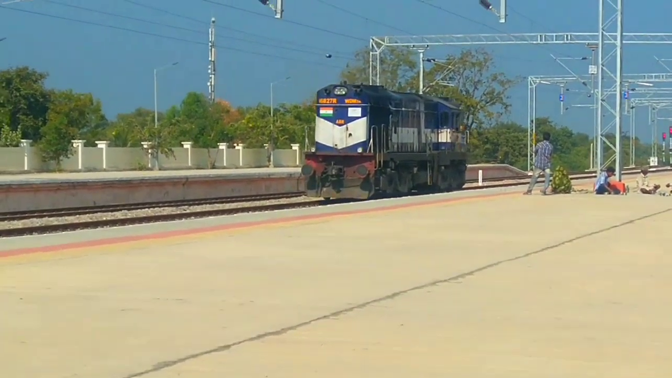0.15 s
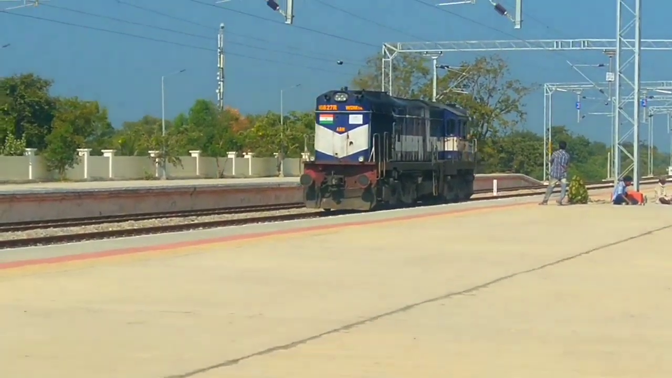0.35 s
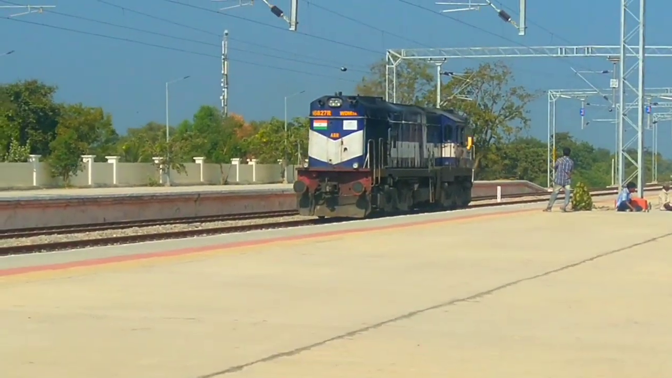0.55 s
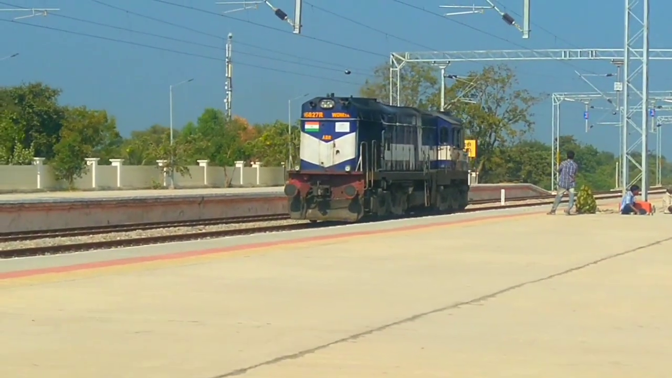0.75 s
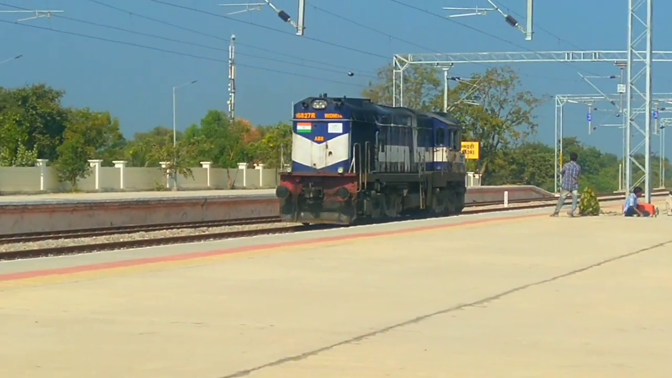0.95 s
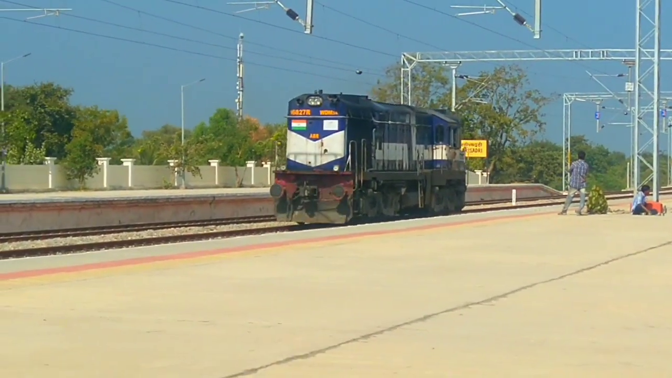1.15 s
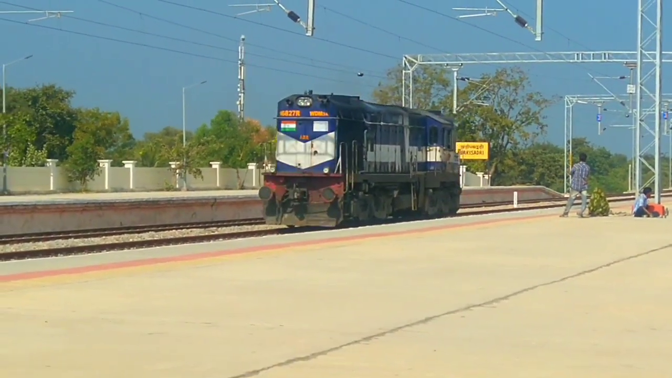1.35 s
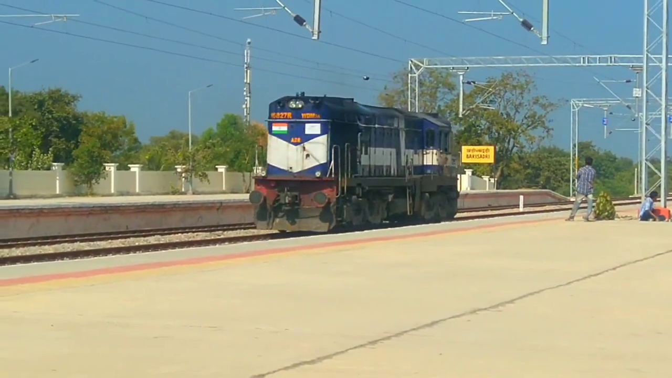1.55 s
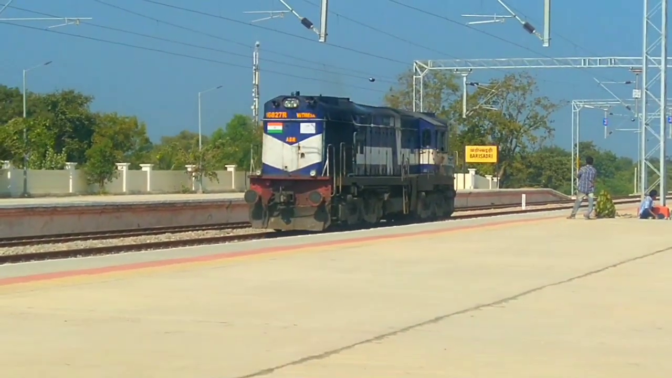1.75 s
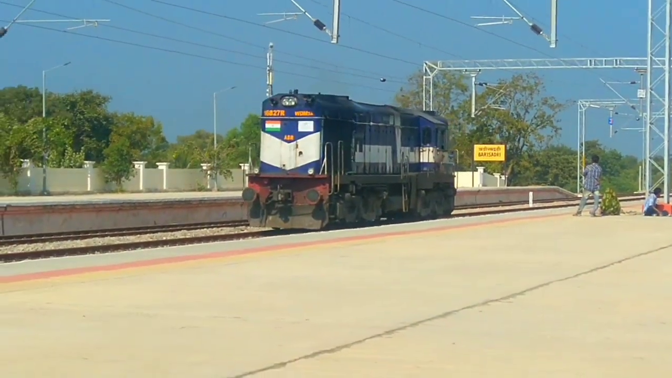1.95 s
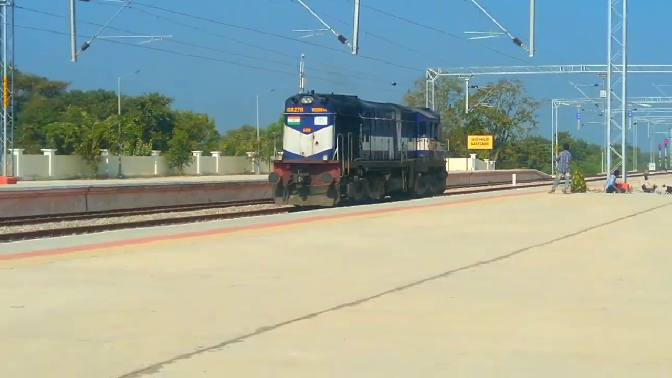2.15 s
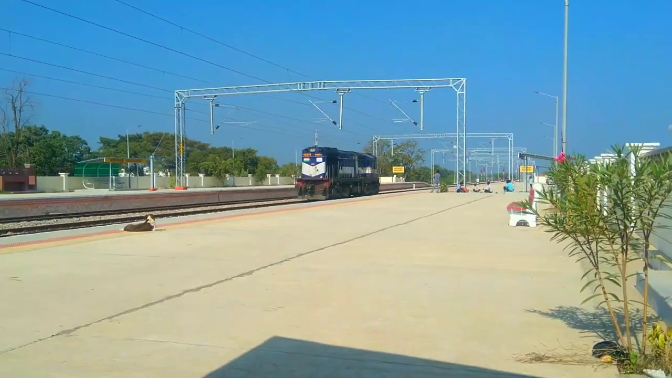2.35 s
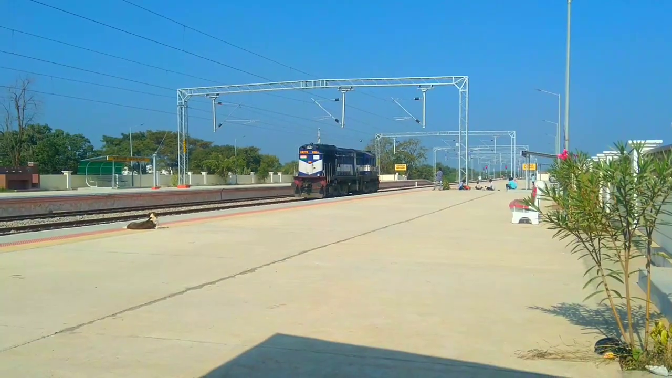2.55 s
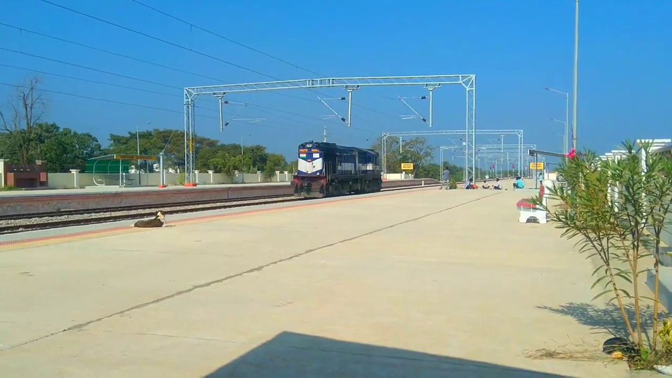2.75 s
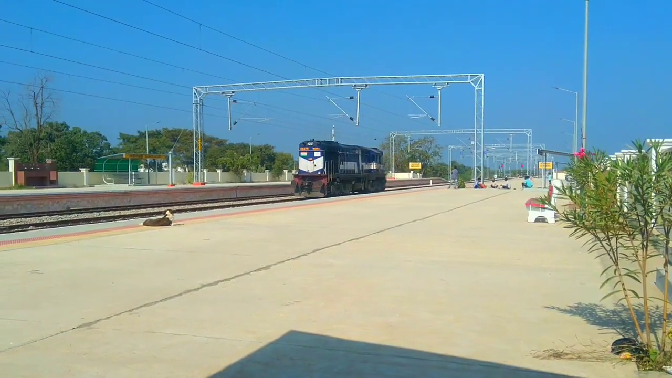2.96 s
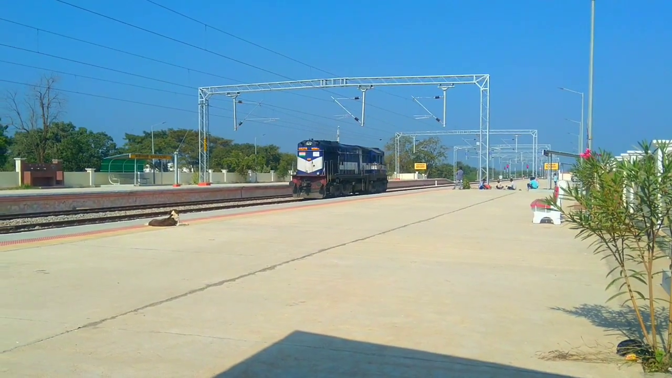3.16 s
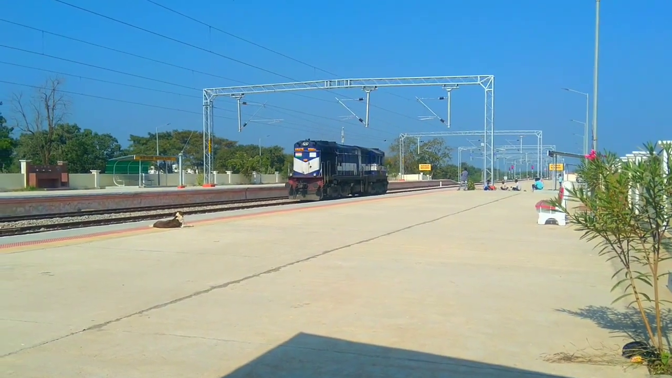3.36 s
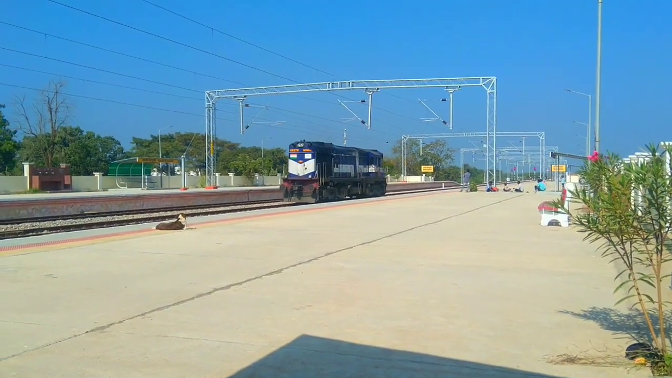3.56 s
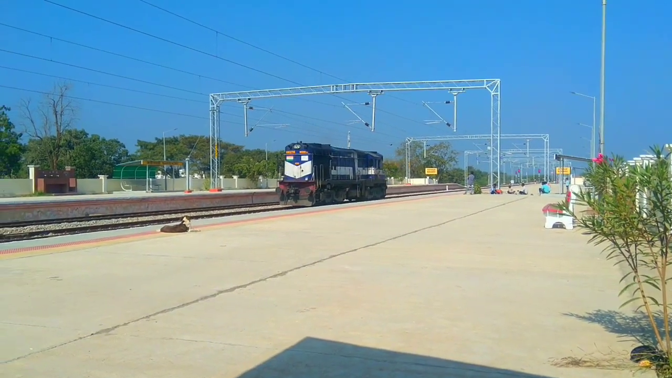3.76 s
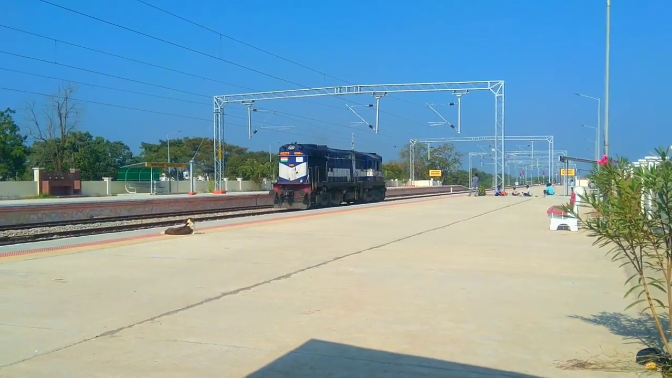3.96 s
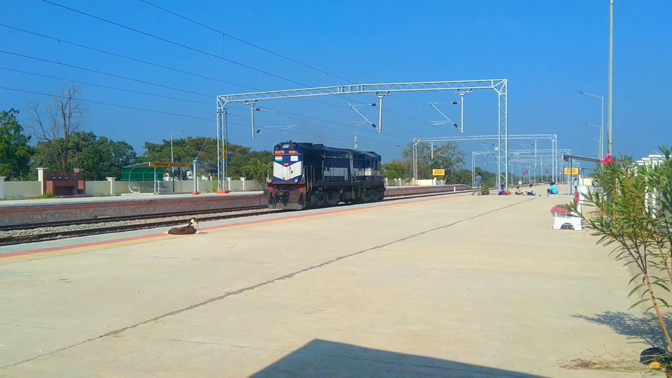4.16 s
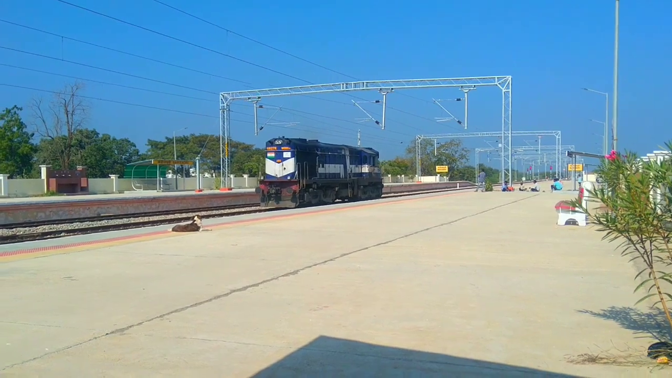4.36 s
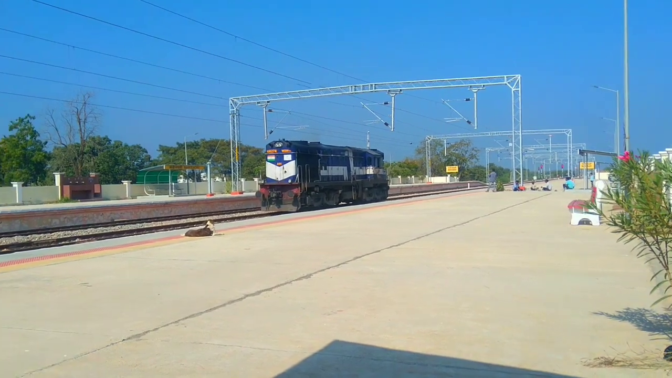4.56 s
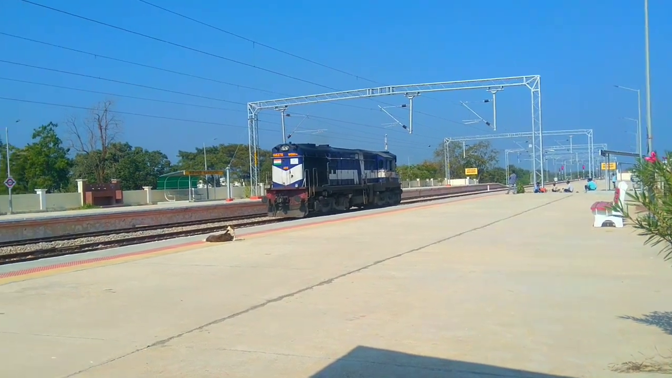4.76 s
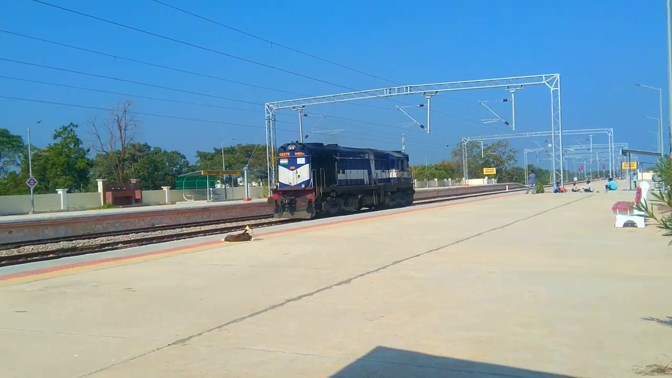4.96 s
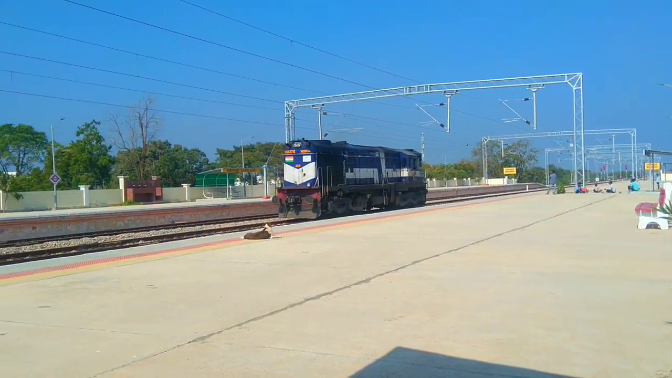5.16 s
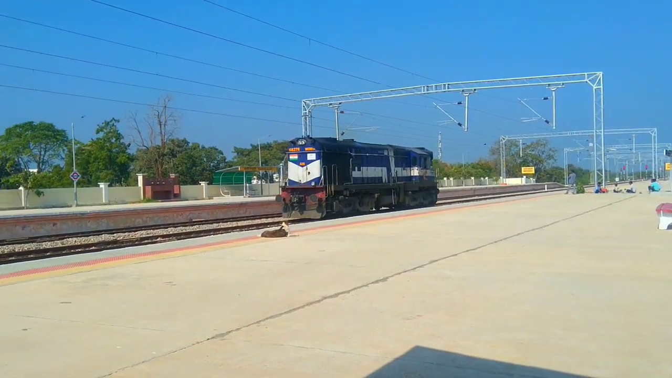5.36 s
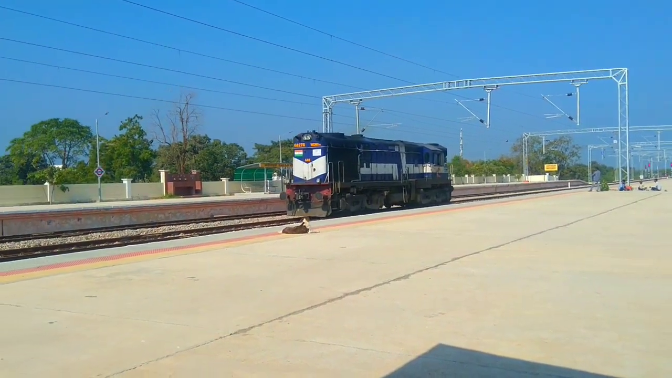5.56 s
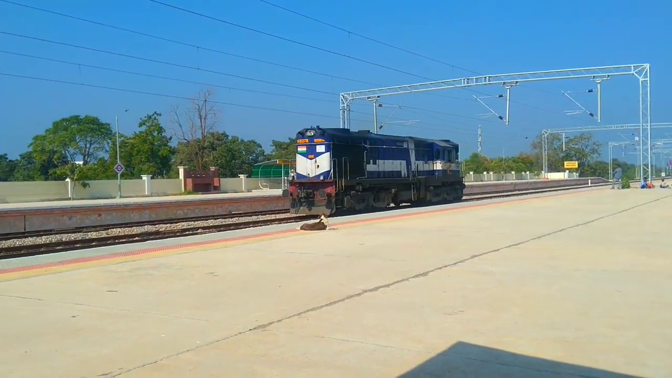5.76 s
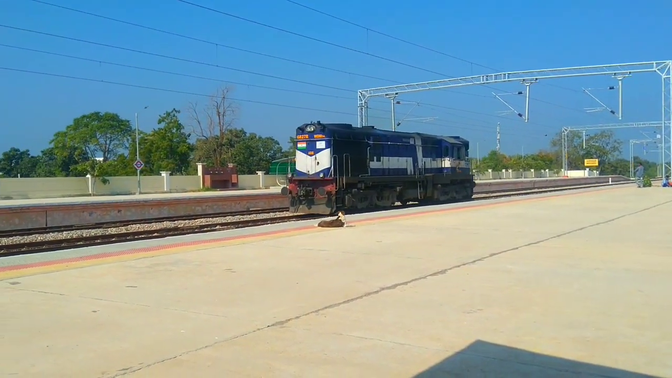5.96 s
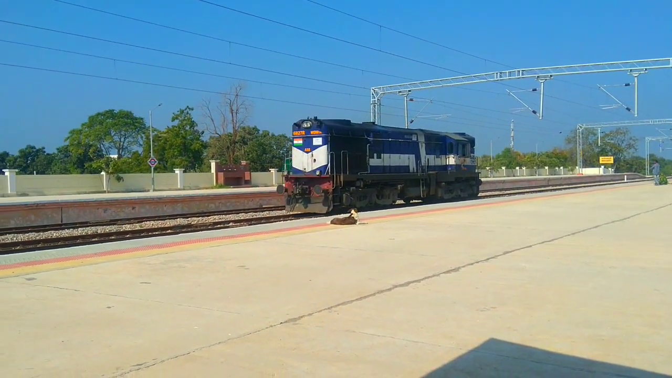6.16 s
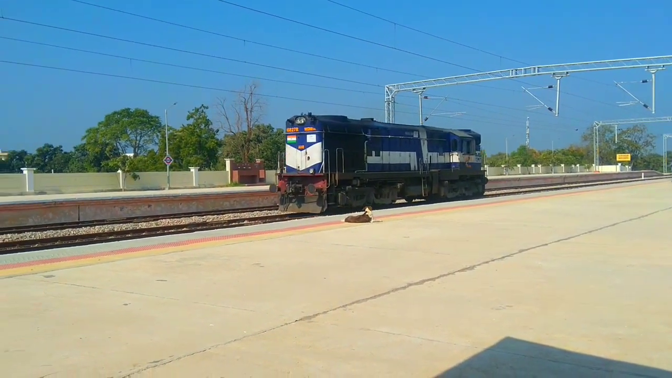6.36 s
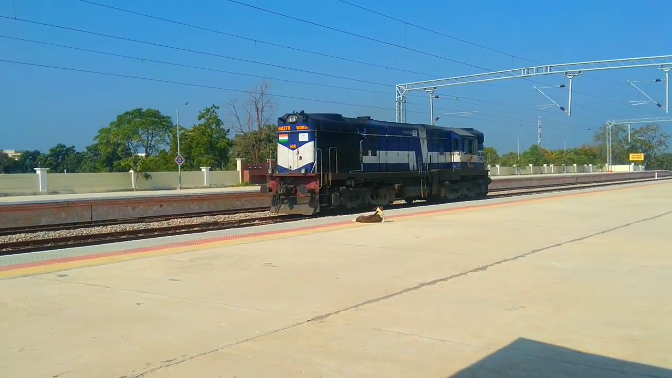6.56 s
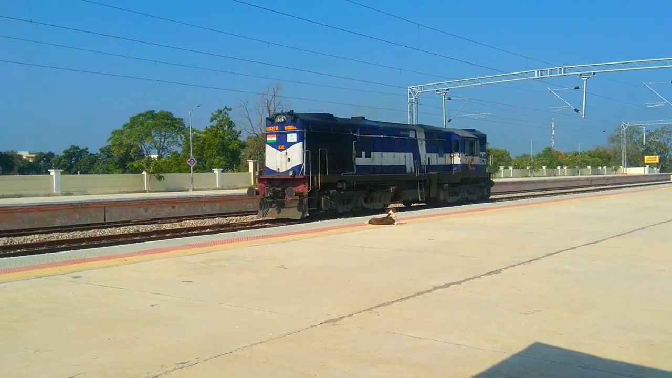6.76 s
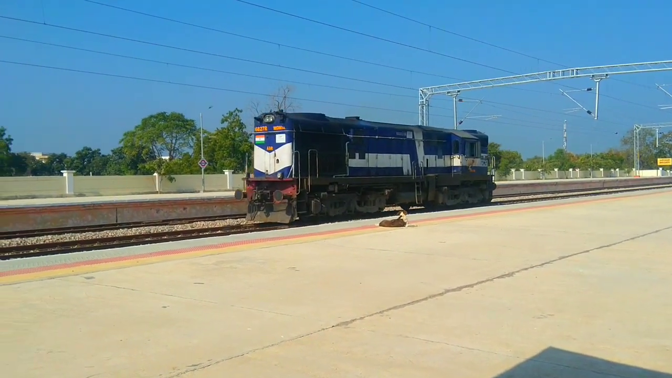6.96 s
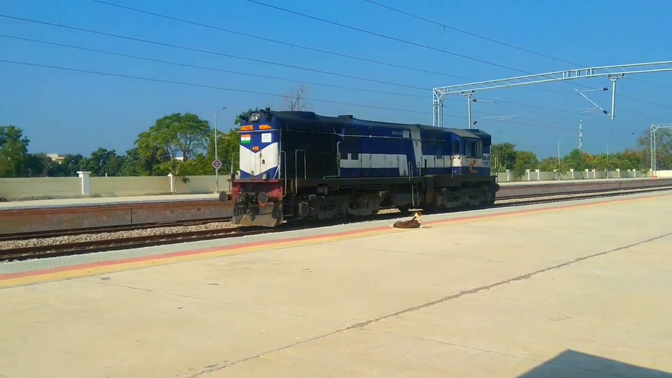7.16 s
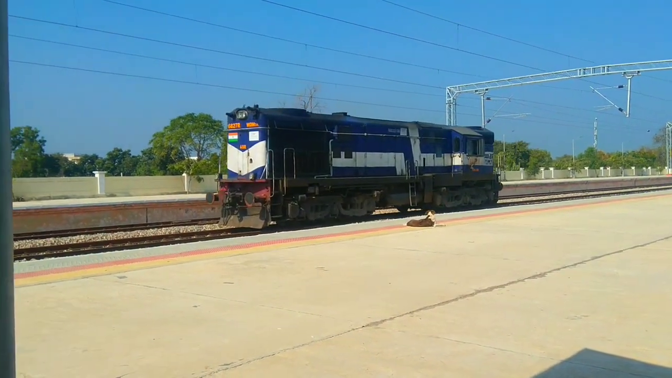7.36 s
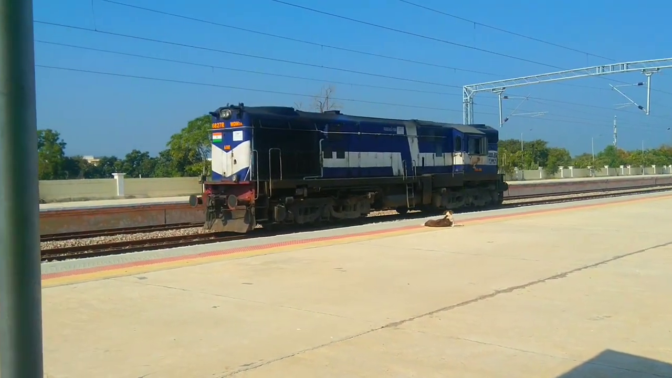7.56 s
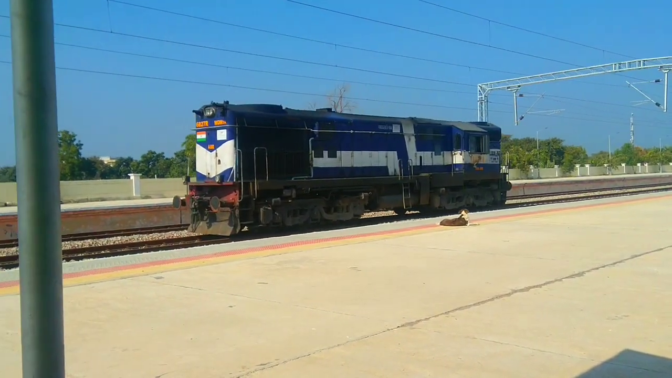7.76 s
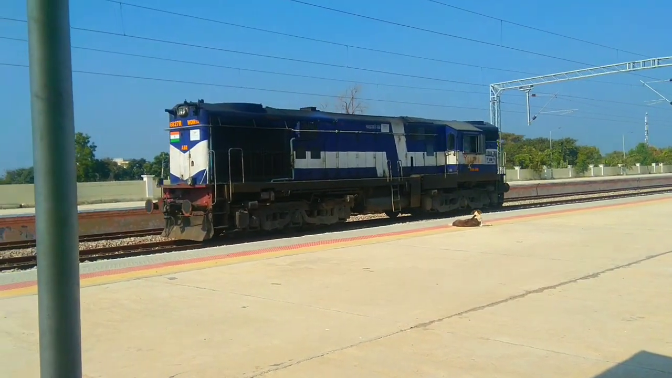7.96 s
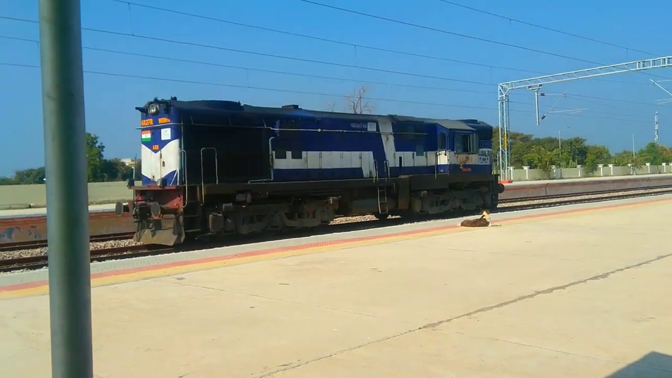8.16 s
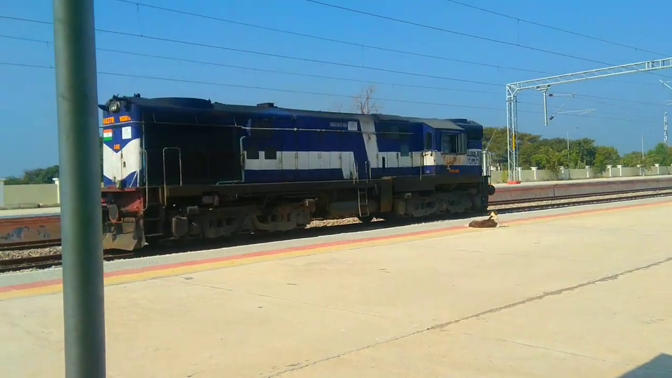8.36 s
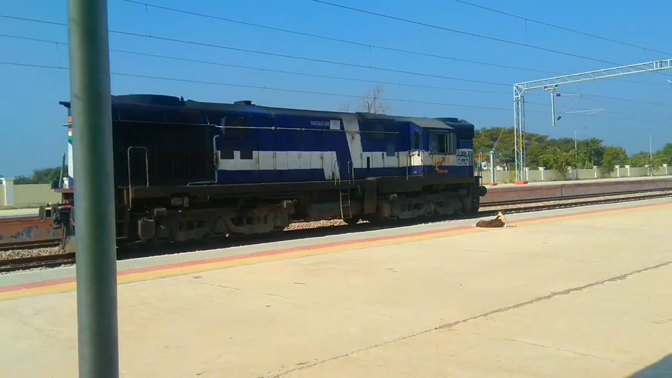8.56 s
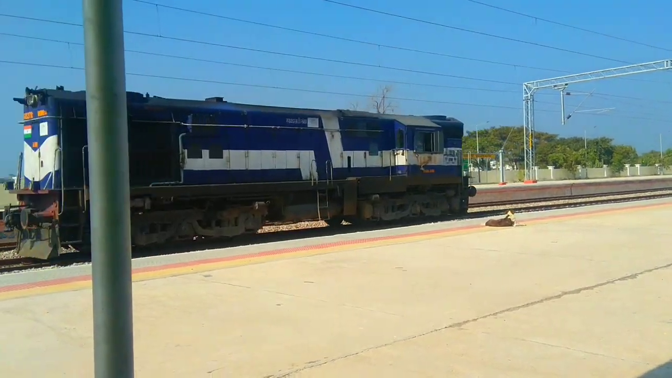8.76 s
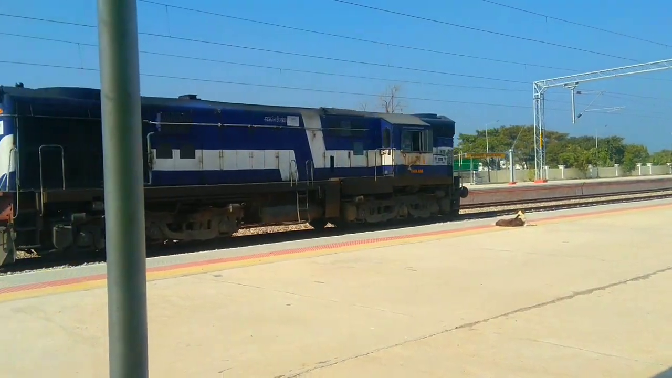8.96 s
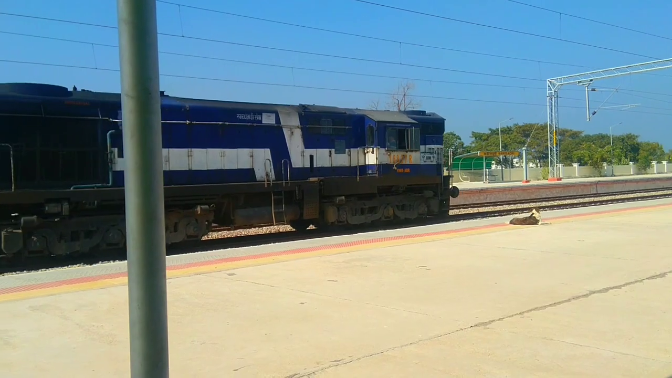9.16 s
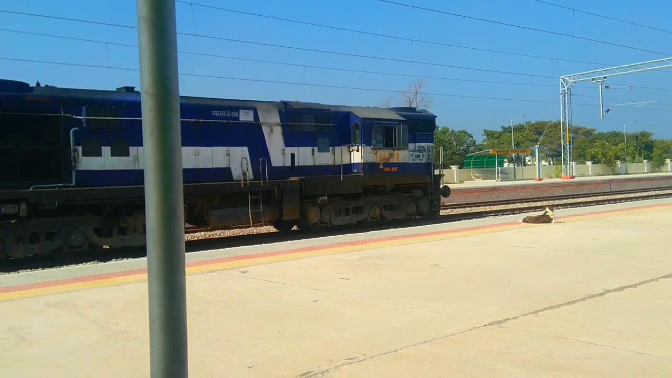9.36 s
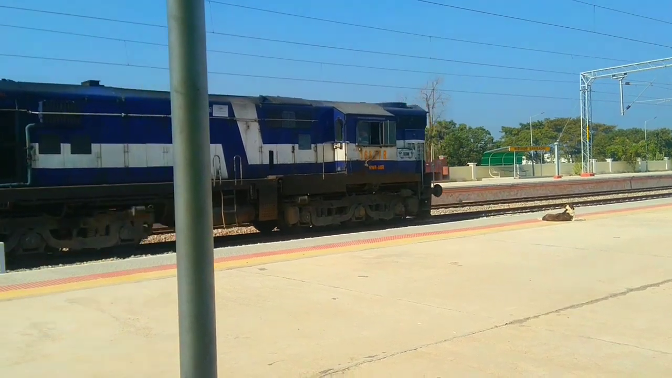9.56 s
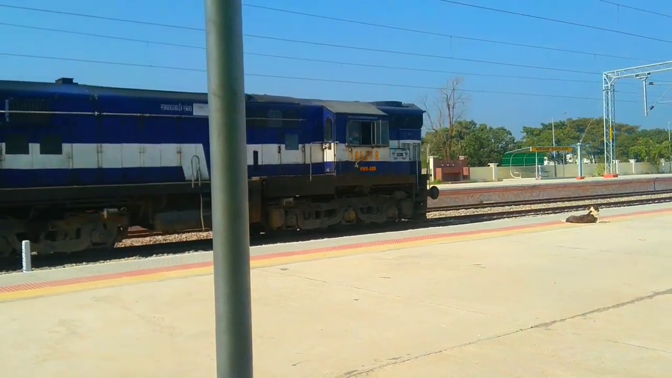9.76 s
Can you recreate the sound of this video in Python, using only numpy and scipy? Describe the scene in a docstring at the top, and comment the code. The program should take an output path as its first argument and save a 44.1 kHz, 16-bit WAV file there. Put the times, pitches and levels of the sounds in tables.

```python
"""Diesel locomotive at a platform

A diesel locomotive rolls slowly along an open station platform and draws level with the listener.
Pulses of sixteen cylinders ring the exhaust stack, where separate chugs sound as decaying notes.
Filtered noise makes the gas, clatter and hiss; gliding resonances make the turbocharger and a whine.
An air valve blows off once; close by, the loudest swings of the exhaust boom are flattened."""
import sys
import numpy as np
from scipy import signal
from scipy.fft import rfft, irfft
from scipy.io import wavfile
from scipy.ndimage import uniform_filter1d, map_coordinates

SR = 44100
rng = np.random.default_rng(int(sys.argv[2]) if len(sys.argv) > 2 else 0)


def master(y):
    """Save y as 16-bit WAV."""
    cut = np.clip(np.atleast_2d(y).T, -1, 1)
    pcm = np.round(cut * 32767)  # scale
    wavfile.write(sys.argv[1], SR, pcm.astype(np.int16))


N = 433062

# Engine speed; one cycle is two turns of the crank. Each row: time in seconds, engine cycles per second.
SPEED = [(0.0, 3.423), (0.8, 3.595), (1.5, 3.813), (2.6, 3.496), (4.0, 3.773), (4.8, 3.595), (5.8, 3.716),
         (7.5, 3.74), (9.82, 3.543)]
# How hard the engine works; it takes up load twice. Each row: time in seconds, effort in dB.
EFFORT = [(0, -10.5), (.45, -15.5), (.56, -1), (.64, 3.5), (1.25, 1), (1.9, -2.5), (2.75, -5), (3.05, 7),
          (3.7, 6.5), (4.3, 3), (6, 2.16), (7.3, 0.8), (8.9, 0.4), (9.82, -1)]
# Air valve. One row: opening in seconds, level in dB, rise in seconds, fall of the jet in dB per second.
VALVE = (2.031, -14.3, .012, 57)


def from_db(db):
    """Amplitude gain is ten to the power of a twentieth of the decibels."""
    return 10 ** (np.asarray(db) / 20)


def rms_one(x):
    """Scaling by the root mean square gives unit power."""
    return x / np.sqrt(np.mean(x ** 2) + 1e-20)


def clock():
    """Sampling: the time of each sample in seconds."""
    return np.arange(N) / SR


def in_time(rows):
    """Linear interpolation of each column of a curve at every sample."""
    s, *columns = np.transpose(rows)
    return [np.interp(clock(), s, c) for c in columns]


def over_bins(points, outside=None):
    """Interpolation over log frequency, read at every spectral bin."""
    hz, value = np.transpose(points)
    log_bins = np.log(np.fft.rfftfreq(N, 1 / SR) + 1e-3)
    return np.interp(log_bins, np.log(hz), value, outside, outside)


def drift(rate):
    """Random modulation: smooth chance of unit power, changing about rate times a second."""
    knots = rng.standard_normal(4000)
    return rms_one(np.interp(clock() * rate, np.arange(len(knots)), knots))


def steady(x, span_s):
    """Envelope flattening: division by the RMS in a sliding window."""
    window = max(int(span_s * SR), 2)
    return x / np.sqrt(np.abs(uniform_filter1d(x ** 2, window)) + 1e-12)


def swell(s, length):
    """A Gaussian envelope: a smooth bump in time."""
    return np.exp(-np.minimum(((clock() - s) / length) ** 2, 20))


def resonate(x, modes):
    """Parallel pipe resonances, each passed twice for steep flanks."""
    f = np.fft.rfftfreq(N, 1 / SR) + 1e-3
    response = 0
    for k, (hz, width, db) in enumerate(modes):
        once = 1 / (1 + 1j * (f * f - hz * hz) / (f * width * np.pi / 2))
        sign = (-1) ** k  # neighbours in opposite phase
        response = response + sign * from_db(db) * once * once
    return irfft(rfft(x) * response, N)


def gliding(x, hz, width_hz):
    """Heterodyning: a steep-sided low-pass around a moving carrier makes a gliding resonance."""
    turn = np.exp(2j * np.pi * np.cumsum(hz) / SR)
    r = np.exp(-np.pi * width_hz / SR)
    low = signal.lfilter([1], [1, -2 * r, r * r], x / turn)
    return rms_one((low * turn).real)


def spread(mid, side):
    """Interaural coherence: two spectra become a stereo pair, alike in the bass, not in the treble."""
    # Likeness of the ears. Each row: frequency in Hz, left-right likeness (held within -1 to 1).
    likeness = [(100, 7), (200, 2), (270, 0.8), (500, 0.84), (1000, 0.5), (2000, 0.22), (4000, 0.26),
                (10000, 0)]
    # Balance of the ears. Each row: frequency in Hz, left minus right in dB.
    balance_db = [(100, -2.5), (500, -2.5), (1100, -3), (2000, -5), (3100, -8.5), (4100, -4.5), (5000, 1.5),
                  (6500, 3), (8300, 6), (10500, 0.5), (13000, 1)]
    alike = np.clip(over_bins(likeness), -1, 1)
    sides = np.array([[1], [-1]])
    pair = np.sqrt(1 + alike) * mid + sides * np.sqrt(1 - alike) * side
    pair = irfft(pair * from_db(sides * over_bins(balance_db) / 2), N)
    return pair / np.std(pair.mean(axis=0))


def noise(colour):
    """Turbulence is broadband: stereo white noise shaped to a given spectrum."""
    white = rfft(rng.standard_normal((2, N)))
    return spread(*white * from_db(over_bins(colour, -np.inf)))


def stack(pulses, puff, turbulence=0.62, bark_turbulence=1.36):
    """Excited resonance: firing pulses and turbulence ring the exhaust, with a little sideways scatter."""
    # Exhaust resonances from low to high. Each row: frequency in Hz, width in Hz, relative level in dB.
    rumble_modes = [(50, 14.3, 6.5), (61.5, 24.4, 8)]
    chest_modes = [(91.4, 5.8, -4), (112.4, 9.8, 0.5)]
    growl_modes = [(136, 9.3, 1), (154.9, 19.5, 1.5)]  # the lower flank of the boom
    boom_skirt = [(177.4, 22.7, -0.022), (200.7, 22, -0.22)]
    bark_modes = [(240.2, 11.3, -4.5), (290.2, 25.2, -1)]
    honk_modes = [(334.4, 20.4, -7.5), (367, 34, 0)]
    # Rumble level. One row: dB when abreast at zero effort, share of the distance law, share of the effort.
    rumble_level = (-25.5, -0.12, 0.36)
    # Chest tone: opens up on the approach, sinks in passing. Each row: seconds, pitch in Hz, level in dB.
    chest_curve = [(0, 112.5, -27.5), (1, 111.7, -25), (2.3, 109.4, -25.5), (3.7, 112.4, -21),
                   (5.0, 110, -25.5), (6, 109.4, -23.5), (7.3, 114, -21), (7.9, 113.3, -19),
                   (8.35, 115.3, -14), (9, 109.6, -12), (9.82, 102, -17.5)]
    # Levels of growl, rough boom between chugs, bark and honk. Each row: time in seconds, level in dB.
    growl_level = [(0, -29), (.6, -24.5), (1.25, -23), (1.6, -24), (2.3, -28.5), (4, -25.5), (5.5, -27),
                   (6.4, -18.5), (7.1, -14.5), (7.8, -13), (8.3, -12), (9.1, -19), (9.82, -12.5)]
    boom_level = [(0, -31), (.9, -26), (1.7, -35.5), (3, -24), (3.9, -26), (4.7, -22.5), (5.8, -19),
                  (6.55, -17.5), (6.66, -10), (6.85, -17.5), (7.6, -16.5), (8.7, -12.5), (9.3, -11.5),
                  (9.82, -10.5)]
    bark_level = [(0, -34.5), (1.2, -30.5), (2.1, -26.5), (2.8, -28.5), (3.6, -26), (4.3, -22.5),
                  (5.7, -22.5), (6.5, -23.5), (7.4, -23), (7.65, -15.5), (8.2, -17.5), (8.8, -15),
                  (9.2, -22), (9.6, -17), (9.82, -24)]
    honk_level = [(0, -37), (1.2, -35), (2.6, -34), (3.5, -29.5), (5, -28.5), (6, -22.5), (7, -23),
                  (7.6, -25), (8.3, -20), (9, -16.5), (9.82, -21)]
    # Surges in every engine cycle. Each row: place in crank turns, height in dB, half width in turns.
    rumble_surges = [(.56, 5.5, 0.26), (1.3, 10, 0.18), (1.93, 10, 0.11)]
    bark_surges = [(.18, 2.5, .13), (.56, 5, .15), (1.2, 2, .13), (1.55, 4.5, .16)]
    # Surges that ring the stack. Each row: the same three, then pitch as a ratio of the chest tone.
    chest_surges = [(.68, -2, 0.19, 0.856), (.95, 2.5, 0.088, 0.878), (1.25, 0.5, 0.15, 1.011)]

    eddies = np.sqrt(puff) * rng.standard_normal(N)
    drive = rms_one(pulses) + turbulence * eddies
    rough_drive = rms_one(pulses) + bark_turbulence * eddies

    rumble = steady(resonate(drive, rumble_modes), 0.046) * throb(rumble_surges, uneven_db=0.5)
    rumble = loudness(rumble_level) * rumble

    chest_hz, chest_db = in_time(chest_curve)
    chest_rough = steady(resonate(drive, chest_modes), 0.061) * throb(chest_surges, uneven_db=3.0)
    chest = beats(chest_surges, chest_hz, uneven_db=2.5, breadth=2.0) + from_db(-4.5) * chest_rough
    chest = from_db(chest_db) * rms_one(chest)

    boom_rough = steady(resonate(drive, boom_skirt), 0.034)
    boom = from_db(0.5) * chugs() + from_db(in_time(boom_level)[0]) * boom_rough

    # the chugs also ring the growl below the boom and the bark above it
    growl = steady(resonate(drive, growl_modes), 0.045) + from_db(-4) * overtone(pitch_ratio=0.815)
    growl = from_db(in_time(growl_level)[0]) * rms_one(growl)
    bark = steady(resonate(rough_drive, bark_modes), 0.036) + from_db(-7.5) * overtone(pitch_ratio=1.54)
    bark = from_db(in_time(bark_level)[0]) * rms_one(bark)
    honk = from_db(in_time(honk_level)[0]) * steady(resonate(rough_drive, honk_modes), 0.056)

    low = rumble + growl + chest + boom
    high = (bark + honk) * throb(bark_surges, uneven_db=1.2)
    direct = (low + high) * signal.windows.tukey(N, 200 / N)  # soft ends
    scattered = delayed(direct, 0.0335)
    return np.std(direct) * spread(rfft(direct), rfft(scattered))


def firings(jitter_s, uneven_db):
    """Path difference: one pulse per cylinder reaches the stack through unequal runners, so it limps."""
    # One engine cycle. Each row: strength of the firing in dB, delay through its runner in seconds.
    cylinders = [(3.5, 0.00098), (1, 0.00566), (1.5, 0.01071), (1, 0.0026), (4.5, 0.01306), (-3.5, 0.0039),
                 (-2.5, 0.0091), (2.5, 0.01538), (-0.5, 0.00295), (-6.5, 0.0125), (4.5, .005),
                 (1.5, 0.00773), (-6, 0.01413), (-2.5, .003), (3, 0.00998), (1, 0.01096)]
    firing_count = np.cumsum(in_time(SPEED)[0]) * len(cylinders) / SR
    at = np.flatnonzero(np.diff(np.floor(firing_count)))
    strength_db, runner_s = np.resize(cylinders, (len(at), 2)).T
    chance = rng.standard_normal((len(at), 2))
    when = at + (runner_s + chance[:, 0] * jitter_s) * SR
    when = np.clip(when, 0, N - 1).astype(int)
    pulses = np.zeros(N)
    pulses[when] = from_db(strength_db + uneven_db * chance[:, 1])
    return pulses


def puffs(pulses, decay_s):
    """Exponential decay: each firing lets out a puff of gas that dies quickly."""
    return rms_one(signal.lfilter([1], [1, -np.exp(-1 / (decay_s * SR))], pulses + 1e-18))


def chugs(pitch_ratio=1, far_length_s=0.041, near_length_s=0.057):
    """Transient ringing: each chug swells into one clear note and dies away, ringing longer close by."""
    # Exhaust chugs, about one to each crank turn. Each row: centre in seconds, level in dB, pitch in Hz.
    chug_rows = [(0.055, -22, 182), (0.194, -22.5, 192.6), (0.348, -16, 194), (0.487, -19, 193.6),
                 (0.64, -19.5, 192), (0.804, -19.5, 179.6), (0.939, -20.5, 184.5), (1.038, -22, 185.5),
                 (1.187, -18.5, 191.4), (1.317, -22, 195), (1.441, -23, 190), (1.713, -23, 190),
                 (1.843, -21, 193), (1.978, -21, 186.4), (2.104, -22, 184), (2.246, -19.5, 186.5),
                 (2.396, -20.0, 189.3), (2.532, -21, 177), (2.666, -19.0, 184.5), (2.821, -17, 193),
                 (2.959, -16.5, 196), (3.102, -17.5, 184), (3.235, -23, 179), (3.376, -18, 191.6),
                 (3.505, -21.5, 183.3), (3.658, -20, 193.5), (3.825, -18.5, 196), (4.055, -16.5, 192.7),
                 (4.18, -21, 192.4), (4.313, -23, 190), (4.447, -22.5, 187), (4.628, -18.5, 182),
                 (4.764, -15.0, 182), (4.921, -17, 180.6), (5.198, -17, 183), (5.316, -14, 178.2),
                 (5.416, -18, 183), (5.556, -22, 176), (5.677, -24, 195.6), (5.819, -20, 193),
                 (5.97, -18, 205.5), (6.22, -15, 182.4), (6.373, -12.5, 193), (6.497, -16, 196),
                 (6.754, -8.5, 190.3), (6.876, -10, 177.6), (7.039, -6, 182.7), (7.189, -8.5, 182),
                 (7.35, -8, 197), (7.561, -7.5, 193.2), (7.699, -10.5, 183), (7.874, -9.5, 186.3),
                 (7.984, -9.5, 185), (8.153, -7.5, 183), (8.374, -13.5, 189), (8.567, -4, 172.7),
                 (8.831, -10, 181.5), (9.204, -6.5, 196.7), (9.341, -6, 198), (9.48, -6.5, 198.5),
                 (9.613, -7, 196.8), (9.769, -6, 194.8)]
    t, out = clock(), np.zeros(N)
    lengths = far_length_s + (near_length_s - far_length_s) * from_db(nearness_db())
    phases = rng.uniform(0, 2 * np.pi, len(chug_rows))
    for (s, db, hz), phase in zip(chug_rows, phases):
        near = np.abs(t - s) < .2
        age = t[near] - s
        envelope = np.exp(-(age / lengths[near]) ** 2)
        note = np.sqrt(2) * np.cos(2 * np.pi * hz * pitch_ratio * age + phase)
        out[near] += from_db(db) * envelope * note
    return out


def overtone(pitch_ratio):
    """Modal excitation: the same chugs ring another mode, evened over a few turns of the crank."""
    return steady(chugs(pitch_ratio), 0.55)


def beats(surges, hz, uneven_db, breadth):
    """Periodic excitation: each crank-locked surge swells into a clean note of the stack."""
    detune, late_s = .009, .0004  # chance spread of pitch (share) and of timing
    turns, turns_per_s, out = crank_turns(), 2 * in_time(SPEED)[0], 0
    for place, db, width, ratio in surges:
        cycle, offset = np.divmod(turns - place + 3, 2)  # the surge lies at offset 1
        strength, pitch, timing = rng.standard_normal((64, 3))[cycle.astype(int)].T
        age = (offset - 1) / turns_per_s + late_s * timing
        note = np.cos(2 * np.pi * hz * ratio * (1 + detune * pitch) * age)
        envelope = np.exp(-((offset - 1) / (width * breadth)) ** 2)
        out = out + from_db(db + uneven_db * strength) * envelope * note
    return rms_one(out)


def throb(surges, uneven_db):
    """Amplitude modulation locked to the crank, never quite alike from turn to turn; unit power."""
    cycle = np.linspace(0, 2, 200)
    shape_db = 0
    for place, db, width, *_ in surges:
        offset = (cycle - place + 1) % 2 - 1
        shape_db = shape_db + db * np.exp(-(offset / width) ** 2)
    surge_db = np.interp(crank_turns() % 2, cycle, shape_db)
    return rms_one(from_db(surge_db + uneven_db * drift(26)))


def crank_turns():
    """Integration of speed gives the turns of the crank so far."""
    return 2 * np.cumsum(in_time(SPEED)[0]) / SR


def spits(puff, rasp=0.48):
    """Noise bursts: short harsh firings rasp from the stack."""
    # Harsh firings. Each row: centre in seconds, level in dB, length in seconds.
    spit_rows = [(0.679, -32.5, 0.045), (0.869, -33.5, 0.032), (0.95, -31, 0.059), (1.139, -34, 0.015),
                 (1.229, -32, 0.02), (3.074, -33, 0.018), (3.175, -27, 0.04), (3.435, -27, 0.055),
                 (3.71, -28.5, 0.064), (6.55, -28.5, 0.083)]
    # Noise colour. Each row: frequency in Hz, level in dB per Hz.
    spit_colour = [(500, -41), (1300, 12), (2400, 5.5), (4000, 2.5), (6000, -3), (9000, -7), (12000, -29)]
    burst = sum(from_db(db) * swell(s, length / 2) for s, db, length in spit_rows)
    return burst * (1 - rasp + rasp * puff) * noise(spit_colour)


def machinery(puff, gas_rasp=0.06, clatter_rasp=0.3, gas_throb=0.56, flicker_db=1.92):
    """Modulated turbulence: gas rush, fan roar, valve clatter and hiss pulse with the firings."""
    # Noise colours. Each row: frequency in Hz, level in dB per Hz.
    gas_colour = [(330, -51), (450, -1), (520, -5), (600, 1), (680, -4), (800, -2), (930, -11), (1300, -12),
                  (1700, -16.5)]
    fan_colour = [(800, -31), (975, -0.5), (1092, 0.5), (1190, 1.5), (1400, -4.5), (1700, -9.5), (2100, -8),
                  (2800, -59)]
    clatter_colour = [(1200, -22), (1700, 1.5), (2500, 6.5), (2800, 3.5), (3200, 4), (3750, 1), (4000, 2),
                      (4200, 2), (4450, -1.5), (4700, -12), (6000, -27)]
    hiss_colour = [(3800, -21), (4700, 5.5), (5200, 6), (5800, 1), (7200, -4), (8300, -4.5), (9000, -10),
                   (9700, -13.5), (10500, -14.5), (12400, -14), (15500, -19.5)]
    # Part levels. One row each: dB when abreast at zero effort, share of distance law, share of effort.
    gas_level = (-24.5, 0.45, 0.41)
    fan_level = (-26, 1.28, 0.29)
    clatter_level = (-29, 1, 1)
    hiss_level = (-38, 1, 0.86)
    # Surges in every engine cycle. Each row: place in crank turns, height in dB, half width in turns.
    rush_surges = [(.1, 1.1, 0.2), (.93, 2.9, 0.081)]

    depth = 1 - .58 * from_db(nearness_db())  # close by, many parts blend into a steadier roar
    flow = throb(rush_surges, uneven_db=1.13) ** depth
    flicker = from_db(flicker_db * depth * drift(40))
    gas = loudness(gas_level) * noise(gas_colour) + loudness(fan_level) * noise(fan_colour)
    gas = gas * rms_one(1 - gas_rasp + gas_rasp * puff) * flow ** gas_throb
    clatter = loudness(clatter_level) * noise(clatter_colour) + loudness(hiss_level) * noise(hiss_colour)
    clatter = clatter * rms_one(1 - clatter_rasp + clatter_rasp * puff) * flow
    return (gas + clatter) * flicker


def turbocharger(flutter_hz=58, surge_hz=50, flutter_follows=1.1):
    """Frequency modulation: a whistle in a breathy band flutters with its surges, more under load."""
    # Turbocharger. Each row: time in seconds, pitch in Hz, level in dB.
    turbo_curve = [(0, 1940, -46), (.42, 1920, -43), (.56, 2026, -38.5), (1.1, 2050, -36.5),
                   (1.8, 1976, -40), (2.3, 2050, -43), (2.87, 2050, -38.5), (2.96, 2035, -33.5),
                   (3.65, 2187, -30.5), (4.4, 2123, -35.5), (5.4, 2053, -32), (6.2, 2000, -34.5),
                   (7.4, 1877, -39.5), (9.0, 2045, -31.5), (9.82, 1980, -38.5)]
    # Surges in every engine cycle. Each row: place in crank turns, height in dB, half width in turns.
    turbo_surges = [(.15, 3.5, 0.06), (.92, 2.9, 0.078)]
    pitch_hz, level_db = in_time(turbo_curve)
    flow = throb(turbo_surges, uneven_db=1.0)
    load = from_db(flutter_follows * in_time(EFFORT)[0])  # widens both flutter_hz and surge_hz
    hz = pitch_hz + load * (flutter_hz * drift(55) + surge_hz * (flow - 1))
    breathy = gliding(rng.standard_normal((2, N)), hz, width_hz=320)
    whistle = steady(gliding(rng.standard_normal((2, N)), hz, width_hz=60), 0.024)
    return from_db(level_db) * flow * spread(*rfft(breathy + from_db(-4) * whistle))


def chirps(length_s=.018, sag_hz_per_s=1900, waver_hz=20, left_db=-1.0):
    """Falling tone bursts: now and then the turbocharger catches briefly on one clear, sinking note."""
    # Brief chirps. Each row: centre in seconds, level in dB, pitch at the centre in Hz.
    chirp_rows = [(.535, -35, 2060), (.572, -40, 2100), (.597, -44, 3250), (1.144, -37.5, 3130),
                  (2.959, -33, 1925), (3.07, -35, 2120), (3.44, -23.5, 2190), (3.485, -30.5, 2080),
                  (3.57, -28, 2110), (3.65, -28, 2060), (3.715, -18.5, 2330), (3.88, -32, 2240),
                  (3.99, -29.5, 2160), (4.07, -31, 2380), (4.2, -37, 2300), (4.28, -32.5, 2450),
                  (4.42, -29.5, 2130), (4.98, -26, 2150), (5.07, -42, 2200), (5.26, -25, 2100),
                  (5.36, -38.5, 2140), (5.53, -30, 2170), (9.09, -27, 2045)]
    t, waver, out = clock(), waver_hz * drift(60), np.zeros(N)
    for s, db, hz in chirp_rows:
        near = np.abs(t - s) < 4 * length_s
        age = t[near] - s
        phase = 2 * np.pi * np.cumsum(hz - sag_hz_per_s * age + waver[near]) / SR
        out[near] += from_db(db) * np.exp(-(age / length_s) ** 2) * np.sqrt(2) * np.sin(phase)
    return out * from_db([[left_db], [-left_db]])


def sinking_band(wander_hz=18, waver_db=2.0):
    """Narrow-band noise: a wandering band sinks in pitch on the approach, a fan-like whine close by."""
    # Sinking band. Each row: time in seconds, pitch in Hz, level in dB.
    band_curve = [(0, 1470, -54.5), (.9, 1374, -41), (2.2, 1256, -47.5), (3.3, 1196, -43), (4.5, 1136, -44),
                  (5, 1120, -36.5), (6.2, 1100, -35), (7, 1140, -33.5), (7.7, 1117, -30),
                  (8.8, 1086, -26.5), (9.82, 1050, -32)]
    pitch_hz, level_db = in_time(band_curve)
    hz = pitch_hz + wander_hz * drift(24)
    band = gliding(rng.standard_normal((2, N)), hz, width_hz=65)
    tone = spread(*rfft(steady(band, .02)))
    return from_db(level_db + waver_db * drift(6.6)) * tone


def high_bands(wander_hz=25, waver_db=2.5):
    """Narrow-band noise: thin high bands, wavering separately and growing on the approach."""
    # Thin high bands. Each row: frequency in Hz, width in Hz, relative level in dB.
    bands = [(8120, 100, -1), (9620, 260, -4.5), (12470, 220, -16.5)]
    # Their common level. Each row: time in seconds, level in dB.
    bands_level = [(0, -73.5), (2.5, -68), (4.6, -60), (5.1, -54), (6, -61.5), (7.5, -49.5), (8.3, -47.5),
                   (9, -46.5), (9.82, -49.5)]
    pair = 0
    for hz, width, db in bands:
        waver = from_db(db + waver_db * drift(6))
        pair = pair + waver * gliding(rng.standard_normal((2, N)), hz + wander_hz * drift(10), width)
    return from_db(in_time(bands_level)[0]) * spread(*rfft(pair))


def air_valve():
    """Jet noise through a ringing pipe: it fades with the pressure and dulls as the valve shuts."""
    # Colours of the jet and its lingering tail. Each row: frequency in Hz, level in dB per Hz.
    jet_colour = [(500, -25), (850, -3), (1000, -10), (1280, 0), (1600, -5), (2500, 1), (3400, -3),
                  (4200, -2), (5000, -3), (6200, -2), (8500, -4), (11000, -10), (12500, -25), (15000, -38)]
    tail_colour = [(700, -8), (1000, -12), (1300, -8), (2000, -13), (2900, -8), (3250, -8), (3700, -3),
                   (4000, -4), (4300, -7), (4600, -12), (6300, -13), (8000, -20), (9600, -29), (11000, -46)]
    # Ringing of the air pipe. Each row: frequency in Hz, width in Hz, relative level in dB.
    pipe_modes = [(2489, 35, -4), (2850, 120, -10), (4115, 25, -4), (5355, 25, -10), (5741, 20, -7),
                  (6322, 25, -9), (6481, 25, -9), (7057, 20, -10), (8496, 30, -12), (9200, 60, -15)]
    s, db, rise, fall = VALVE
    tail_db, tail_fall, open_s = -17.5, 15, .21  # relative dB, dB per s, s
    age = np.maximum(clock() - s, 0)
    pipe = spread(*rfft(resonate(rng.standard_normal((2, N)), pipe_modes)))
    bright = station(noise(jet_colour)) + from_db(-7.5) * pipe
    dull = signal.sosfiltfilt(signal.butter(2, 4500, fs=SR, output="sos"), bright)
    opening = .85 / (1 + (age / open_s) ** 8)
    jet = (dull + (bright - dull) * opening) * from_db(-fall * age)
    tail = noise(tail_colour) * from_db(tail_db - tail_fall * age)
    return from_db(db) * np.minimum(age / rise, 1) * (jet * from_db(1.1 * drift(90)) + tail)


def seep():
    """Band-limited flow noise: a thin, steady hiss in two bands sets in with the blast and stays."""
    # Seeping air. Each row: frequency in Hz, width in Hz, relative level in dB.
    seep_modes = [(3720, 180, 3), (4194, 71, -3.5)]
    opened = np.clip((clock() - VALVE[0]) / VALVE[2], 0, 1)
    hiss = spread(*rfft(resonate(rng.standard_normal((2, N)), seep_modes)))
    return from_db(-45) * opened * hiss


def surroundings():
    """Stationary noise: the steady wash of the open surroundings."""
    # Noise colour. Each row: frequency in Hz, level in dB per Hz.
    wash_colour = [(370, 3), (430, -1), (510, -7.5), (630, 0), (830, 0), (1020, -8.5), (1400, -10),
                   (1750, -14.5), (2300, -10.5), (3150, -19.5), (3500, -49), (4500, -36), (5200, -18.5),
                   (6200, -31), (6700, -55), (7800, -56), (8400, -32.5), (9600, -47)]
    return from_db(-34.5) * noise(wash_colour)


def nearness_db():
    """Spherical spreading at a steady pace, relative to the moment of drawing level."""
    roll_m_per_s, track_m, abreast_s = 5.66, 11, 9.08
    along_m = roll_m_per_s * (abreast_s - clock())
    return 20 * np.log10(track_m / np.hypot(track_m, along_m))


def loudness(level):
    """Source power and spreading: gain follows nearness and engine effort, each by its own share."""
    db, distance_share, effort_share = level
    return from_db(db + distance_share * nearness_db() + effort_share * in_time(EFFORT)[0])


def delayed(x, delay_s):
    """Propagation delay of one channel, fixed or changing."""
    return map_coordinates(x, [np.arange(N) - delay_s * SR], order=3, mode="mirror")


def station(x):
    """Comb filtering: a few hard echoes colour the sound finely; the power stays the same."""
    # Echoes from masts, platform edges and walls. Each row: delay in seconds, level in dB.
    echoes = [(.0057, -21), (.0134, -14.5), (.0231, -27.5), (.0378, -14), (.059, -25.5)]
    out = x
    for s, db in echoes:
        out = out + from_db(db) * np.pad(x, ((0, 0), (int(s * SR), 0)))[:, :N]
    return out * np.std(x) / np.std(out)


def travel(x, echo_gain=0.12, abreast_echo_ms=1.95, echo_ms_per_db=-1.37, abreast_top_hz=17000, dulling=0.41):
    """Interference and absorption: a faint echo, its delay shortening on the approach; distance dulls."""
    near_db = nearness_db()
    echo_ms = abreast_echo_ms + echo_ms_per_db * near_db
    top_hz = abreast_top_hz * from_db(dulling * near_db)
    echo = np.array([delayed(side, echo_ms / 1000) for side in x])
    x = (x + echo_gain * echo) / np.hypot(1, echo_gain)
    f, t, spectra = signal.stft(x, SR, nperseg=512)
    passed = 1 / np.sqrt(1 + (f[:, None] / np.interp(t, clock(), top_hz)) ** 20)
    return signal.istft(spectra * passed, SR)[1][:, :N]


def scene():
    """Superposition of all sources; a changing interaural delay moves them from right to left."""
    # Arrival at the ears. Each row: time in seconds, lead of the left ear in milliseconds.
    ear_lead = [(0, -0.048), (2.4, -0.017), (3.2, 0.033), (5, 0.023), (7, 0.034), (9.82, 0.11)]
    pulses = firings(jitter_s=0.0012, uneven_db=0.5)
    puff = puffs(pulses, decay_s=0.022)
    rush = machinery(puff) + high_bands() + sinking_band() + turbocharger() + chirps()
    rush = station(rush) + spits(puff)
    left, right = stack(pulses, puff) + travel(rush) + air_valve() + seep() + surroundings()
    return np.array([left, delayed(right, in_time(ear_lead)[0] / 1000)])


def record(dry):
    """Soft saturation flattens the loudest swings; a steep low-pass cuts the top."""
    ceiling, cutoff_hz = 1.25, 15700
    x = dry * from_db(0.08) / ceiling
    held = ceiling * x / (1 + x ** 8) ** (1 / 8)
    return signal.sosfilt(signal.ellip(10, .1, 80, cutoff_hz, fs=SR, output="sos"), held)


dry = scene()
out = record(dry)
master(out)
```